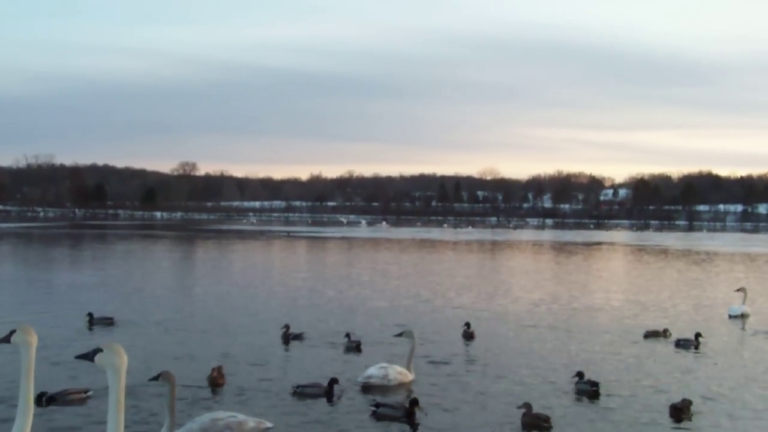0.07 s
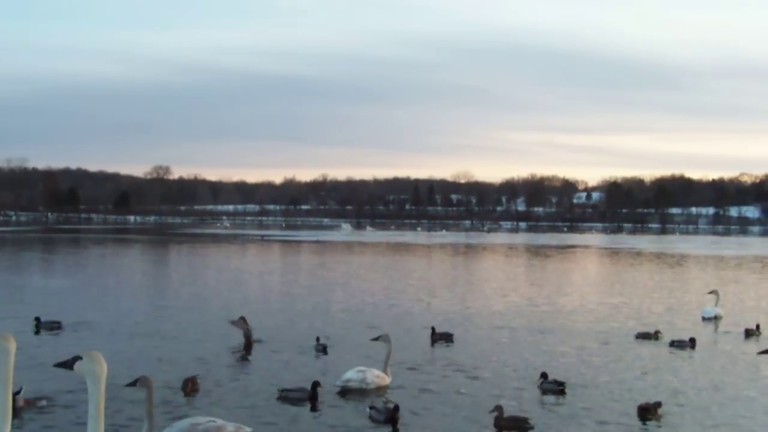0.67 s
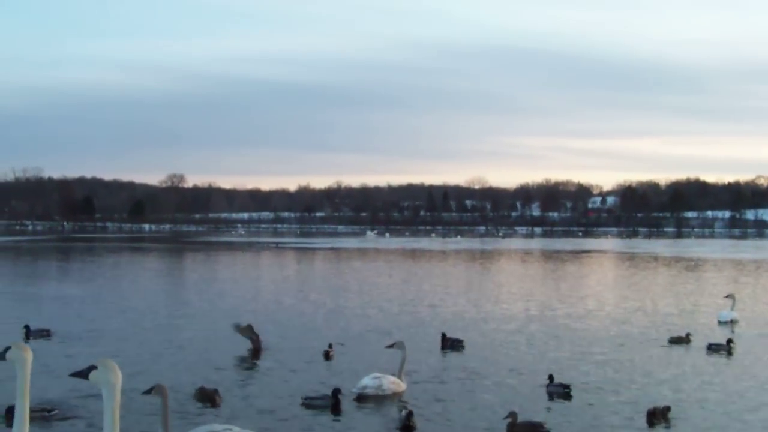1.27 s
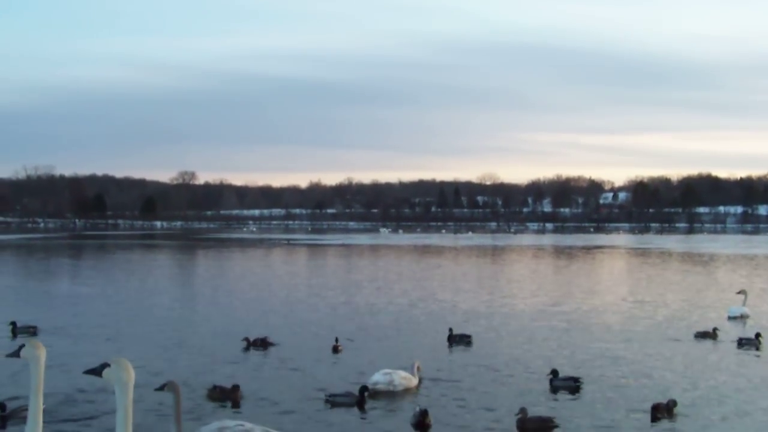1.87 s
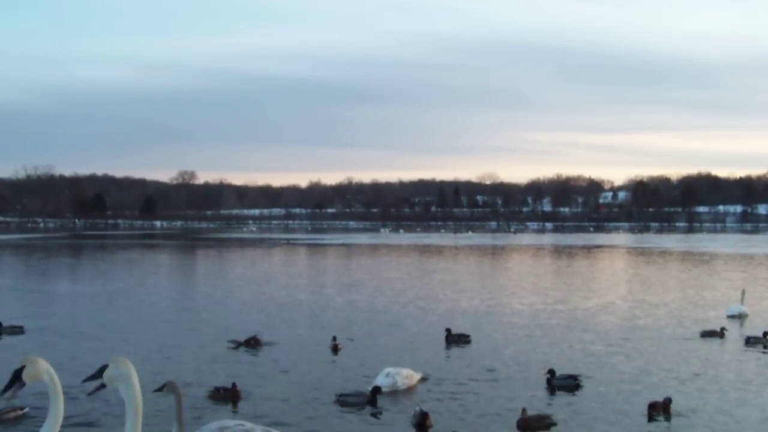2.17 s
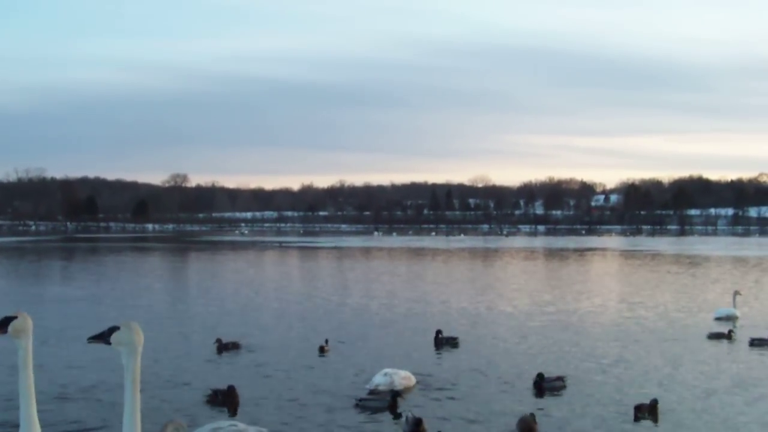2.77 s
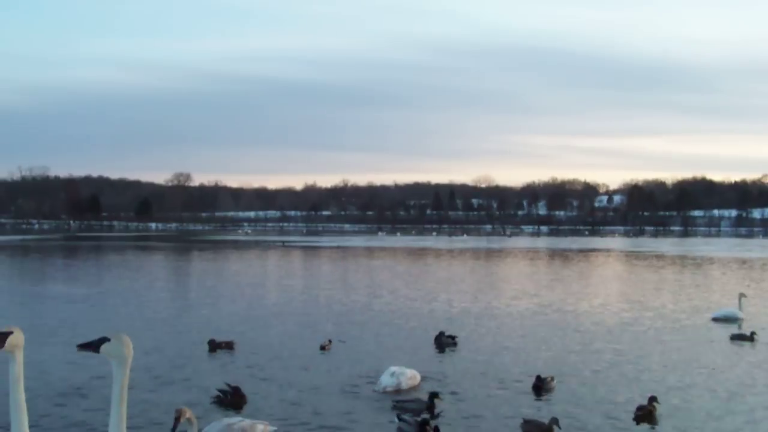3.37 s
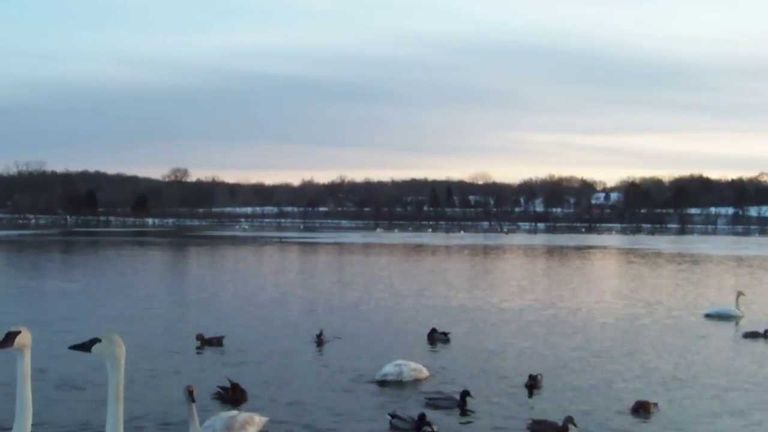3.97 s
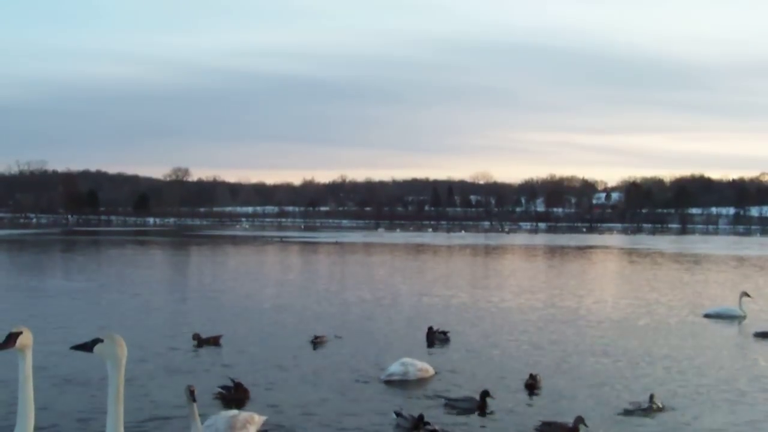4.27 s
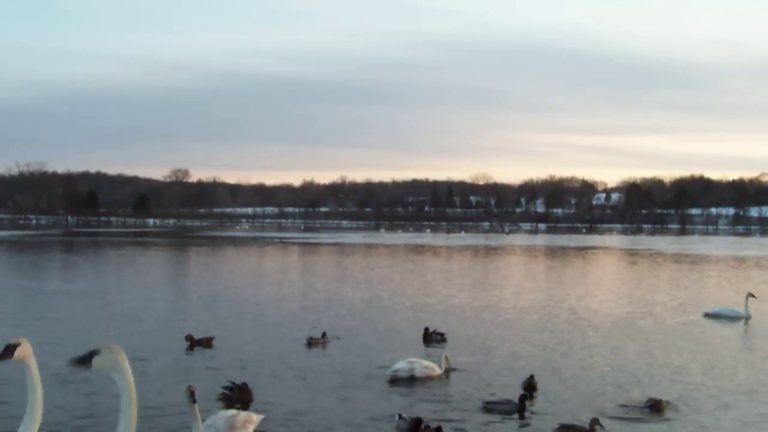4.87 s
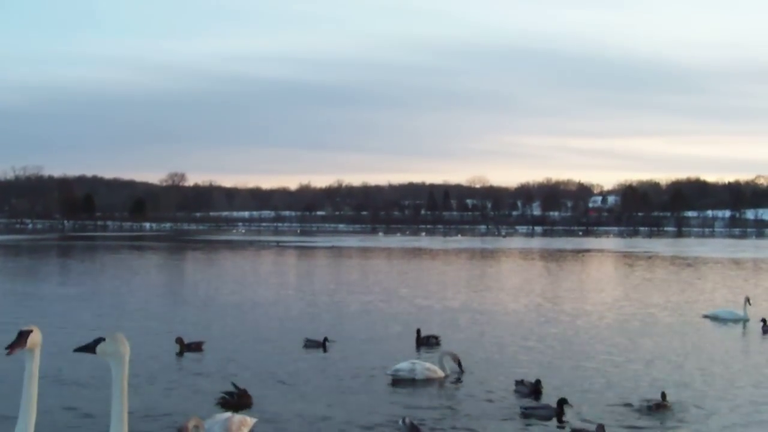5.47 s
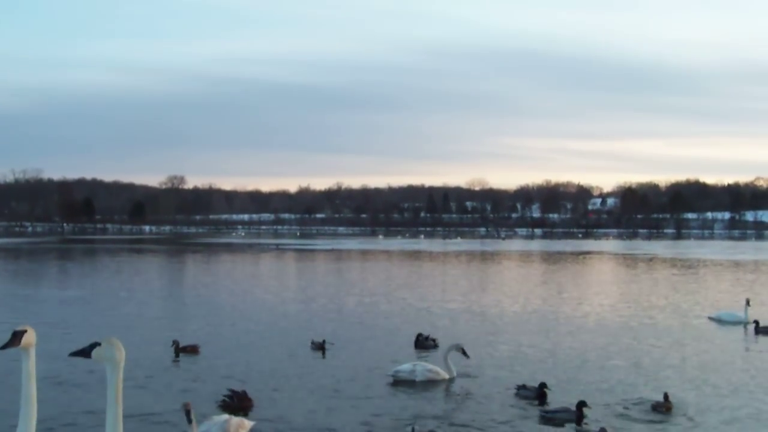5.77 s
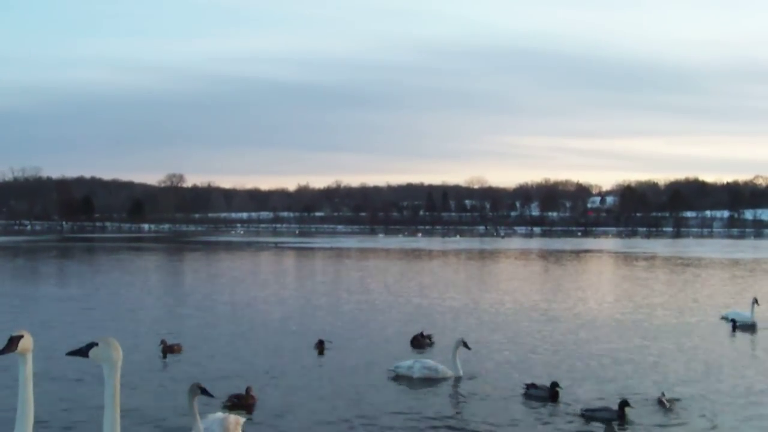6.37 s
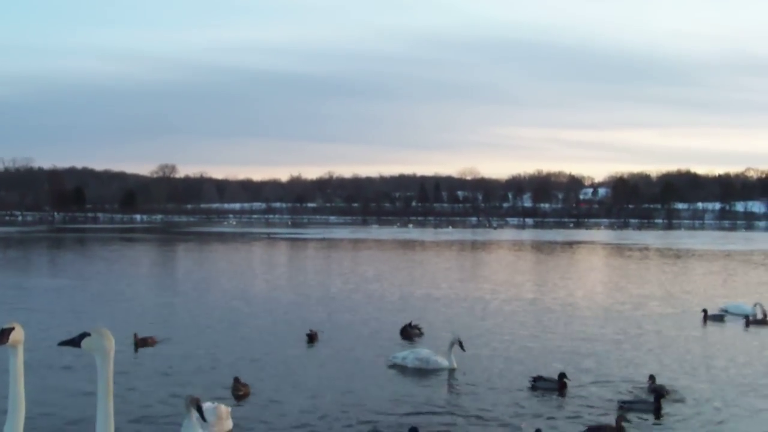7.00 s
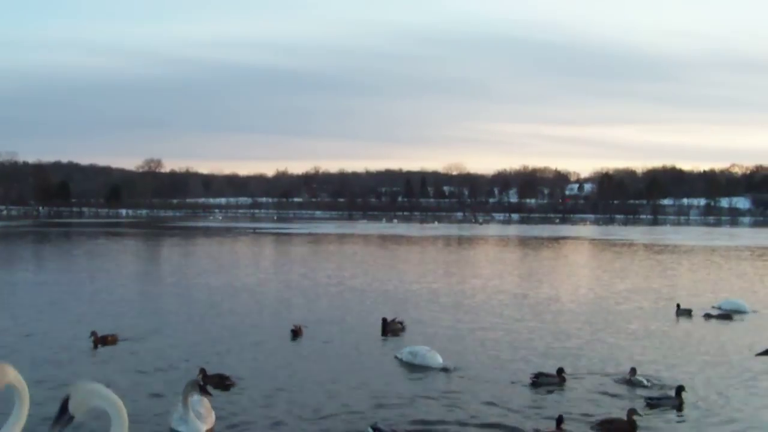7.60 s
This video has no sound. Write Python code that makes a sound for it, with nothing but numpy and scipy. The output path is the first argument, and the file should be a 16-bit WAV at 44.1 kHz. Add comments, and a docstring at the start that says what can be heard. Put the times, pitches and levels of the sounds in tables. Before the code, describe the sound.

Several swans close to the shore honk at each other in three quick, brassy bursts, high and low voices overlapping, with a few hoarse grunts from a young one. Soft far-off honks come before the first and loudest burst. A distant waterbird's thin cry repeats through the gaps, and small duck splashes come before the last burst. Faint lapping and a steady open-air hush lie underneath.

```python
"""On the shore of a winter lake, two trumpeter swans honk at each other in overlapping, brassy bursts.
A lower voice and a raspy young one join in. Each voice is a stream of air puffs that rings a long
windpipe; pushing harder adds blare. Further off, other swans honk softly, a waterbird repeats a thin
cry and a faint whistle falls. Ducks splash and water laps, both as tiny ringing drops, over a quiet
outdoor hush. The loudest honks overload the input and distort."""
import sys
import numpy as np
from scipy import signal
from scipy.fft import rfft, irfft
from scipy.io import wavfile
from scipy.ndimage import uniform_filter1d

SR = 44100
rng = np.random.default_rng(int(sys.argv[2]) if len(sys.argv) > 2 else 0)


def output_pcm(signal):
    """Save a mono or channel-first signal as 16-bit PCM at the path in sys.argv[1].

    Samples are clipped to [-1, 1] before scaling.
    """
    pcm = np.clip(np.atleast_2d(signal).T, -1, 1) * 32767
    wavfile.write(sys.argv[1], SR, np.round(pcm).astype(np.int16))


N = 341334
TIME = np.arange(N) / SR

# Levels in all tables are relative: the functions set the final loudness.
# Resonances, the pitches at which a throat rings. TONE is the round part, BLARE the brassy part.
# Each row: centre in Hz, width in Hz, level in dB.
HIGH_TONE = [(440.7, 36, 3.5), (837, 83, 12.5), (1323.6, 112, 10.5)]
HIGH_BLARE = [(1637, 126, -7), (2093, 74, -9), (2614, 138, 0.5), (2974, 127, 2), (3407, 237, 3),
              (3935, 380, 1.5), (4330, 326, -4.5), (5000, 290, -18)]
YODEL_TONE = [(390, 27, -13.5), (705.5, 163, 9), (1246, 82, -2)]
YODEL_BLARE = [(1539, 370, -2), (2086, 160, -1.5), (2417, 540, -7), (2560, 34, -11), (2850, 540, 0.5),
               (3680, 220, 2), (4700, 900, -10)]
LOW_TONE = [(273, 61, -20), (661, 420, 0.5), (862, 69, 3), (1030, 74, -9.5)]
LOW_BLARE = [(1630, 110, -2), (2030, 820, -5), (3100, 1300, -7.5)]
RASPY_TONE = [(215.4, 70, 2), (490, 67, 17.5), (641, 170, 17.6), (848, 81, 19)]
SOFT_THROAT = [(402, 110, -13.5), (734, 128, 10), (1127, 110, -8.5), (1545, 220, -6), (1796, 380, -6.5),
               (2300, 570, -12), (2800, 81, -8.5), (3200, 430, -10.5)]
FAR_THROAT = [(655, 120, -13), (1310, 200, 0), (1960, 250, -14), (2620, 300, -18), (3270, 300, -7),
              (3900, 400, -20)]
# Short honks. Each row: start and length in seconds, top pitch in Hz, tone and blare in dB,
# shrill edge in dB compared with the blare.
HIGH_HONKS = [(1.993, 0.089, 427.3, -10.5, -9, -9), (2.119, .11, 432.5, -13.5, -4.5, -6.5),
              (2.277, .082, 428.5, -12.5, -7.5, -3), (3.034, 0.029, 415.4, -9, -14.5, -1),
              (4.583, 0.067, 418.3, -12, -16, 5), (4.714, 0.074, 415.4, -14, -20, 7.5),
              (4.854, 0.08, 426, -11, -14, 0), (5.002, 0.049, 427.2, -11, -12.5, -5),
              (7.213, 0.067, 416.7, -10, -19, -17.5), (7.333, 0.065, 418.7, -11.5, -14.5, -15),
              (7.467, 0.065, 419.8, -10.5, -14, -6), (7.598, 0.056, 423, -11, -16, -14)]
LOW_HONKS = [(1.714, 0.072, 298, -18, -19.5, -4), (2.034, 0.073, 304.4, -12, -16, 1),
             (4.646, 0.064, 287.3, -20, -32.5, -2), (5.14, .055, 301.8, -16.5, -23, -8),
             (7.035, 0.054, 273.3, -24.5, -50, -9), (7.188, 0.055, 290.8, -23, -28.5, -7),
             (7.404, .052, 302.9, -12, -14, -3)]
# The high swan's one long call, pushed three times. Each row: time in seconds, pitch in Hz.
TRUMPET_PITCH = [(2.436, 411), (2.45, 417.3), (2.478, 431.2), (2.484, 420.3), (2.56, 443.7), (2.616, 423.5),
                 (2.64, 414.6), (2.66, 436.1), (2.734, 440.3), (2.8, 435.8), (2.824, 430.2), (2.836, 409),
                 (2.87, 436), (2.936, 435.4), (2.964, 420.8)]
# The high swan turns its head. Each row: time in seconds, delay on the left in milliseconds.
HIGH_SWAN_LAG = [(2.37, .17), (2.43, .06), (3.0, .06), (4.5, .17)]
# Honks that break upward. Each row: start, length and time spent low in seconds, top pitch in Hz,
# tone and blare in dB.
YODELS = [(1.72, 0.074, 0.042, 342, -14, -29.5), (1.84, .086, .034, 403, -6.5, -29),
          (1.968, 0.098, 0.049, 390, -8.5, -26), (2.12, .06, 0.041, 340, -13, -24),
          (2.441, 0.056, 0.023, 378, -0.5, -8), (2.509, 0.097, 0.0037, 386, -7.5, -18.5),
          (2.704, 0.27, 0.003, 396, -5.5, -16), (3.018, 0.05, 0.027, 380, -9, -12.5),
          (4.733, .07, 0.033, 393, -5, -27), (4.85, 0.074, .032, 402, -5, -18.5),
          (4.986, 0.079, 0.025, 393, -4.5, -14.5), (7.344, 0.068, 0.028, 388, -5.5, -13),
          (7.48, 0.067, 0.039, 389, -9.5, -23.5)]
# The young swan's grunts. Each row: start and length in seconds, puffs per second, tone and bill
# levels in dB, the bill's swell time in seconds, its first and last resonance in Hz.
GRUNTS = [(2.237, .1, 118, -24.5, -13, 0.11, 1490, 3140),
          (5.185, 0.1, 113.6, -21, -13.5, 0.068, 2570, 2960), (5.298, .1, 128, -23, -12, 0.051, 1126, 3100),
          (5.462, .066, 124, -22, -19.5, .012, 3220, 2690),
          (6.742, 0.076, 112, -32.5, -28.5, 0.0062, 3040, 2603),
          (7.64, 0.078, 111.5, -24, -18, 0.026, 2400, 2900)]
# Distant swans and a far waterbird. Each row: start and length in seconds, top pitch in Hz, level in dB.
SOFT_HONKS = [(-.02, 0.16, 397.4, -42), (.155, 0.1, 396, -41.5), (.265, 0.054, 416, -46),
              (.405, 0.048, 400, -45), (.58, 0.11, 393.5, -41.5), (.775, 0.069, 363, -47.5),
              (1.235, 0.065, 419, -49), (1.42, 0.061, 390, -43), (1.495, 0.1, 391, -39.5),
              (1.64, 0.04, 392, -40)]
FAR_CRIES = [(1.13, 0.17, 675, -41), (2.33, 0.053, 642, -23.5), (2.85, .17, 641.3, -26.5),
             (3.445, 0.18, 649, -31.5), (4.185, 0.16, 650, -31), (4.73, 0.19, 668, -33.5),
             (5.275, 0.17, 635, -27.5), (5.745, 0.17, 654.7, -26.5), (6.165, 0.16, 655.4, -26),
             (6.61, 0.15, 664.6, -27), (7.05, 0.18, 652, -27.5), (7.535, 0.2, 661, -29)]
# A falling whistle. Each row: start and length in seconds, first and final pitch in Hz, level in dB.
WHISTLES = [(1.585, 0.14, 3200, 2296, -48)]
# Ducks splashing. Each row: start in seconds, level in dB, seconds to fade by 20 dB, centre in Hz.
SPLASHES = [(0.08, -41, 0.031, 3750), (0.383, -32, 0.017, 1390), (1.742, -24, 0.0052, 5000),
            (5.557, -36.5, 0.051, 4000), (5.853, -30, 0.036, 3485), (6.081, -30, 0.086, 2800),
            (6.104, -36, 0.069, 3500), (6.165, -27.5, 0.075, 1730), (6.205, -46, 0.16, 1900),
            (6.207, -30.5, 0.06, 307), (6.261, -40.5, 0.55, 3200), (6.322, -27.5, 0.022, 4600),
            (6.356, -55, 0.031, 4000), (6.404, -54, 0.072, 3027), (6.446, -49, 0.037, 3460),
            (6.497, -44, 0.054, 2600), (7.022, -44, 0.0306, 3255), (7.558, -32.5, 0.02, 2800)]
# Water stirred by the birds. Each row: time in seconds, level in dB.
LAPPING = [(0.0, -49), (3.4, -51), (6.2, -38.5), (7.74, -46.5)]
# The outdoor hush from bass to treble. Each row: frequency in Hz, level in dB.
HUSH_SPECTRUM = [(15, -55), (25, 0), (59, -0.5), (230, -2), (314, -20), (471, -1.5), (815, -1), (1190, -7),
                 (1970, -8.5), (2500, -17), (3100, -12), (6660, -29.5), (7500, -24.5), (9750, -76),
                 (16500, -120)]
# How alike the hush is on both sides. Each row: frequency in Hz, likeness (1 means the same).
HUSH_LIKENESS = [(30, 0.97), (250, 0.98), (800, 0.74), (2000, 0.4), (6000, 0.16)]


def swan_voice(controls, tone, blare, jitter, rasp, tone_db, blare_db, lag_ms, tone_pan_db, blare_pan_db):
    """The long windpipe rings with a round tone; pushing harder adds blare, then a shrill edge."""
    pitch, tone_gain, effort, shrill_db = controls
    puffs = voice_box(pitch, jitter, rasp, shimmer_db=.8)
    airy = puffs + .7 * rng.standard_normal(N)
    edge = throat(airy, [(4600, 970, 9.3), (5330, 2000, 2.8), (6780, 380, 5.6)])
    bright = from_db(blare_db) * effort * (throat(puffs, blare) + from_db(shrill_db) * effort * edge)
    mellow = from_db(tone_db) * tone_gain * throat(puffs, tone)
    return place(mellow, lag_ms, tone_pan_db) + place(bright, lag_ms, blare_pan_db)


def voice_box(pitch, jitter, rasp, shimmer_db=1):
    """One sharp puff a cycle. Jitter shakes its pitch, shimmer its strength; rasp adds air noise."""
    phase = 2 * np.pi * np.cumsum(pitch * (1 + jitter * drift(300))) / SR
    sharpness = .96
    puffs = np.real(1 / (1 - sharpness * np.exp(1j * phase))) - 1
    air = rng.standard_normal(N) * (1 + np.cos(phase))
    return (rms_one(puffs) + rasp * air) * from_db(shimmer_db * drift(220))


def throat(x, resonances):
    """The throat rings at several pitches at once; their sum is held at level 1."""
    rings = (from_db(db) * resonate(resonate(x, hz, width), hz, width) for hz, width, db in resonances)
    return hold_level(sum(rings))


def honks(calls, attack_s, release_s, push_share, slacken_s, sag, slack_db):
    """Controls for plain honks: the push of air builds, lifting pitch and blare, then slackens."""
    age, length, hz, tone_db, blare_db, shrill_db = current_call(calls)
    voiced = envelope(age, length, attack_s, release_s) ** 2
    slack = 1 - envelope(age, length, push_share * length, slacken_s)
    effort = voiced * from_db(blare_db - slack_db * slack)
    return [hz * (1 - sag * slack), voiced * from_db(tone_db), effort, shrill_db]


def with_trumpet(controls, tone_db, top_blare_db, shrill_db, blare_db_per_hz):
    """Between the short honks comes one long call that blares harder as its pitch climbs."""
    times, hz = np.transpose(TRUMPET_PITCH)
    pitch = np.interp(TIME, times, hz)
    voiced = envelope(TIME - times[0], times[-1] - times[0], attack_s=.012, release_s=.031) ** 2
    blare_db = top_blare_db - blare_db_per_hz * (hz.max() - pitch)
    trumpet = [pitch, voiced * from_db(tone_db), voiced * from_db(blare_db), shrill_db]
    return [np.where(voiced > 0, long, short) for long, short in zip(trumpet, controls)]


def high_swan():
    """Steady puffs make clear, high honks and one long trumpet call."""
    calls = honks(HIGH_HONKS, attack_s=.012, release_s=.013, push_share=.75, slacken_s=.02,
                  sag=.035, slack_db=11)
    calls = with_trumpet(calls, tone_db=-9.5, top_blare_db=-1, shrill_db=-1, blare_db_per_hz=.5448)
    return swan_voice(calls, HIGH_TONE, HIGH_BLARE, jitter=.004, rasp=.16, tone_db=-1.3, blare_db=1.57,
                      lag_ms=over_time(HIGH_SWAN_LAG), tone_pan_db=-1.5, blare_pan_db=-.05)


def yodelling_swan(low_hz=339.6, break_s=.0073, dip_db=4.5, sag_s=.034, sag=.11, shrill_db=-8.5):
    """Each honk starts low, hoarse and dull, breaks upward with a catch, and sags at the end."""
    age, length, low_s, hz, tone_db, blare_db = current_call(YODELS)
    low = .5 - .5 * np.tanh((age - low_s) / break_s)   # 1 before the break, 0 after
    spent = np.clip(1 - (length - age) / sag_s, 0, 1) ** 2
    pitch = (hz + low * (low_hz - hz)) * (1 - sag * spent)
    catch = from_db(-dip_db * np.exp(-((age - low_s) / break_s) ** 2))
    voiced = envelope(age, length, attack_s=.037, release_s=.02) ** 2 * catch
    tone_gain = voiced * from_db(tone_db + 1.5 * low)
    effort = voiced * from_db(blare_db - 8 * low) * (1 - spent)
    rough = 1 + 3 * low
    return swan_voice([pitch, tone_gain, effort, shrill_db], YODEL_TONE, YODEL_BLARE,
                      jitter=.006 * rough, rasp=.26 * rough, tone_db=-1, blare_db=2.5,
                      lag_ms=.034, tone_pan_db=-4.5, blare_pan_db=-2.5)


def low_swan():
    """Slower, shakier puffs with more air make low, husky honks."""
    calls = honks(LOW_HONKS, attack_s=.014, release_s=.02, push_share=.4, slacken_s=.039,
                  sag=.11, slack_db=9.5)
    return swan_voice(calls, LOW_TONE, LOW_BLARE, jitter=.018, rasp=.53, tone_db=-1.94, blare_db=-8,
                      lag_ms=.051, tone_pan_db=-4, blare_pan_db=-2.5)


def raspy_swan(tone_db=5, bill_db=-5, hoarse_db=-7, slack_db=3, sag=.11, attack_s=.013, release_s=.023):
    """Slow, ragged puffs ring the windpipe and the opening bill, over a broad hoarse edge."""
    age, length, pitch, grunt_db, open_db, swell_s, from_hz, to_hz = current_call(GRUNTS)
    slack = 1 - envelope(age, length, length / 2, length / 2)
    voiced = envelope(age, length, attack_s, release_s)
    puffs = voice_box(pitch * (1 - sag * slack), jitter=.028, rasp=.2, shimmer_db=2.5)
    tone = from_db(tone_db + grunt_db - slack_db * slack) * voiced * throat(puffs, RASPY_TONE)
    ragged = puffs + (.7 + .7 * np.sqrt(np.abs(puffs))) * rng.standard_normal(N)
    bill_hz = from_hz + (to_hz - from_hz) * np.clip(age / length, 0, 1)
    ring = hold_level(glide(ragged, bill_hz, width=450))
    hoarse = from_db(hoarse_db) * throat(ragged, [(1900, 650, 3.5), (4000, 4200, -11.5)])
    bill = hold_level(keep_band(ring + hoarse, [1100, 4930], order=2, kind="band"))
    bill *= from_db(bill_db + open_db) * voiced * envelope(age, length, swell_s, release_s)
    return place(tone, lag_ms=.02, pan_db=-2) + place(bill, lag_ms=.03, pan_db=-.5)


def distant_bird(calls, resonances, jitter, rasp, rise, fall, sag, level_db=0, fade_s=.009):
    """Every call arches in pitch and loudness, rising and falling over set shares of its length."""
    age, length, hz, db = current_call(calls)
    arch = envelope(age + fade_s, length + 2 * fade_s, rise * length, fall * length)
    puffs = voice_box(hz * (1 - sag * (1 - arch)), jitter, rasp)
    return from_db(level_db + db) * arch * throat(puffs, resonances)


def whistle(fall_s=.035):
    """A faint, nearly pure tone from further out drops quickly and levels off."""
    age, length, from_hz, to_hz, db = current_call(WHISTLES)
    pitch = to_hz + (from_hz - to_hz) * np.exp(-np.maximum(age, 0) / fall_s)
    tone = np.sin(2 * np.pi * np.cumsum(pitch * (1 + .0076 * drift(140))) / SR)
    gain = from_db(db) * envelope(age, length, attack_s=.02, release_s=.02)
    return place(gain * tone, lag_ms=0, pan_db=7)


def duck_splashes(level_db=4.5, spray=.41, attack_s=.00026):
    """Each splash is a dense burst of drops and spray that dies quickly."""
    water = droplets(per_s=1800, spread_db=3.7, cycles=14) + spray * rng.standard_normal(N)
    out = np.zeros((2, N))
    for start, db, decay_s, hz in SPLASHES:
        span = slice(int(start * SR), int((start + .3) * SR))
        burst = rms_one(resonate(water[:, span], hz, width=.9 * hz))
        age = np.arange(burst.shape[1]) / SR
        attack = 1 - np.exp(-age / attack_s)
        out[:, span] += burst * attack * from_db(level_db + db - 20 * age / decay_s)
    return out


def droplets(per_s, spread_db, cycles, pitches=17):
    """Tiny bubbles and drops of many sizes ring for a few cycles, each pitch from its own side."""
    kicks = from_db(spread_db * np.minimum(rng.exponential(1, N), 4)) * rng.choice([-1, 1], N)
    kicks *= rng.random(N) < per_s / SR
    pitch_index = rng.integers(0, pitches, N)
    out = 0
    for k, hz in enumerate(np.geomspace(850, 6500, pitches)):
        rings = rms_one(resonate(kicks * (pitch_index == k), hz, hz / cycles))
        out = out + place(rings, lag_ms=rng.uniform(.02, .13), pan_db=rng.normal(0, 2))
    return rms_one(out)


def shore_echo(x, near_db=-4, near_s=.078, far_db=-44.5, far_s=.67, dull_hz=4000):
    """A quick scatter from the bank and a faint, dull tail from across the water."""
    age = TIME[:SR]
    bank = from_db(near_db - 60 * age / near_s) / np.sqrt(near_s)
    tail = from_db(far_db - 60 * age / far_s) / np.sqrt(far_s)
    echoes = rng.standard_normal((2, SR)) * (bank + tail) * (age > .004)
    echoes *= np.sqrt(np.log(10 ** 6) / SR)   # gives a full 60 dB fade an energy of 1
    return signal.fftconvolve(x, keep_band(echoes, dull_hz), axes=1)[:, :N]


def hush(level_db=-39.5):
    """Gently wavering air and far-off noise, alike in both ears in the bass."""
    hz = np.arange(N // 2 + 1) * SR / N
    shared, apart = rfft(rng.standard_normal((2, N))) * from_db(at_hz(HUSH_SPECTRUM, hz))
    alike = at_hz(HUSH_LIKENESS, hz)
    air = rms_one(irfft(np.sqrt(1 + alike) * shared + np.sqrt(1 - alike) * apart * [[1], [-1]], N))
    return air * from_db(level_db + drift(11)) * from_db([[-1.1], [1.1]])


def current_call(calls):
    """For every moment, the age of the call under way and the other columns of its row."""
    rows = np.array(calls, float)
    under_way = np.maximum(np.searchsorted(rows[:, 0], TIME + .004) - 1, 0)
    start, *columns = rows.T[:, under_way]
    return TIME - start, *columns


def envelope(age, length, attack_s, release_s):
    """Fade in, hold at 1, fade out; 0 outside the call."""
    fade_in = np.sin(np.pi / 2 * np.clip(age / attack_s, 0, 1))
    fade_out = np.sin(np.pi / 2 * np.clip((length - age) / release_s, 0, 1))
    return fade_in * fade_out


def resonate(x, hz, width):
    """Ring at one pitch; a narrower width rings longer."""
    r = np.exp(-np.pi * width / SR)
    feedback = [1, -2 * r * np.cos(2 * np.pi * hz / SR), r * r]
    return signal.lfilter(np.array([1, 0, -1]) * (1 - r * r) / 2, feedback, x + 1e-18)


def glide(x, hz, width):
    """Ring at a moving pitch: shift down, smooth, shift back."""
    turn = np.exp(2j * np.pi * np.cumsum(hz) / SR)
    return np.real(keep_band(x / turn, width / 2) * turn)


def keep_band(x, hz, order=1, kind="low"):
    """Keep what lies below one frequency, or between two."""
    return signal.sosfilt(signal.butter(order, hz, kind, fs=SR, output="sos"), x)


def place(x, lag_ms, pan_db):
    """Two microphones: the left hears the source later by the lag and louder by the pan."""
    delayed = np.interp(TIME - lag_ms / 1000, TIME, x)
    return np.array([delayed * from_db(pan_db / 2), x * from_db(-pan_db / 2)])


def drift(rate):
    """A random wander that turns `rate` times a second."""
    knots = rng.standard_normal(N // 8)
    return np.interp(TIME * rate, np.arange(len(knots)), knots)


def over_time(points):
    """Join timed points with straight lines."""
    return np.interp(TIME, *np.transpose(points))


def at_hz(points, hz):
    """Read between a table's frequencies, with octaves evenly spaced."""
    known_hz, value = np.transpose(points)
    return np.interp(np.log(np.maximum(hz, 1)), np.log(known_hz), value)


def hold_level(x):
    """Keep the level at 1 from moment to moment."""
    return x / np.sqrt(np.abs(uniform_filter1d(x * x, size=800)) + 1e-12)


def rms_one(x):
    """Set the average level to 1."""
    return x / np.sqrt(np.mean(x ** 2) + 1e-20)


def from_db(db):
    """Turn decibels into a multiplier."""
    return 10 ** (np.asarray(db) / 20)


def overload(x, top):
    """Flatten peaks that reach the top."""
    return x / (1 + (x / top) ** 12) ** (1 / 12)


def scene():
    """Four swans near the shore, other birds further off, water and the hush of the lake."""
    birds = high_swan() + yodelling_swan() + low_swan() + raspy_swan()
    soft_swans = distant_bird(SOFT_HONKS, SOFT_THROAT, jitter=.022, rasp=.1, rise=.4, fall=.65,
                              sag=.048, level_db=12.5)
    waterbird = distant_bird(FAR_CRIES, FAR_THROAT, jitter=.004, rasp=.05, rise=.4, fall=.5, sag=.1)
    birds += place(soft_swans, lag_ms=.01, pan_db=-1) + place(waterbird, lag_ms=-.12, pan_db=-1.5)
    lapping = from_db(over_time(LAPPING)) * droplets(per_s=450, spread_db=3.8, cycles=13)
    birds += whistle() + duck_splashes()
    return birds + shore_echo(birds) + lapping + hush()


def record(dry):
    """Loud honks overload the input; the treble is cut sharply, and what overshoots clips again."""
    treble_cut = signal.ellip(10, .3, 80, 7750, fs=SR, output="sos")
    narrow = signal.sosfilt(treble_cut, overload(dry, top=.95))
    clipped = overload(narrow, top=1)   # throws new treble above the cut
    return keep_band(clipped, hz=17000, order=10)


dry = scene()
out = record(dry)
output_pcm(out)
```